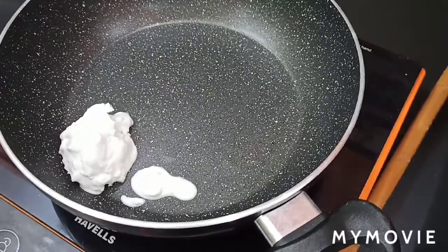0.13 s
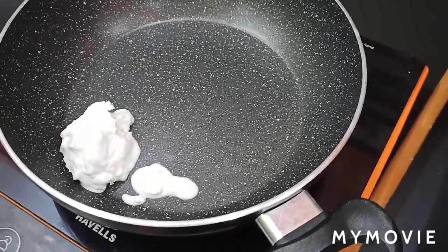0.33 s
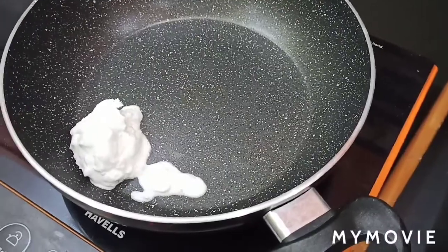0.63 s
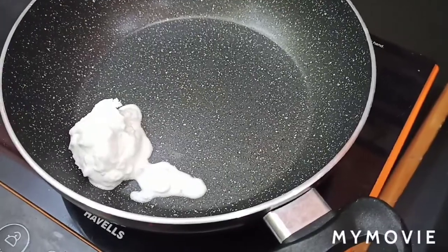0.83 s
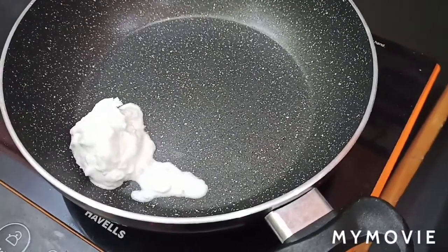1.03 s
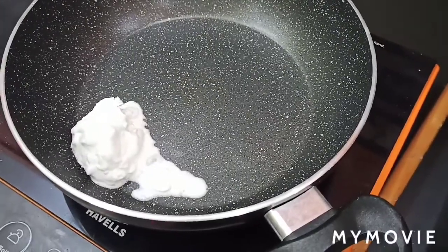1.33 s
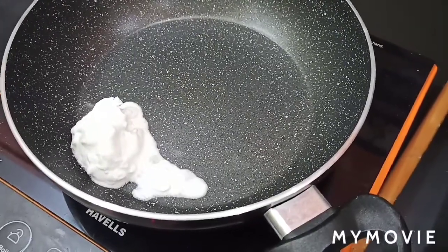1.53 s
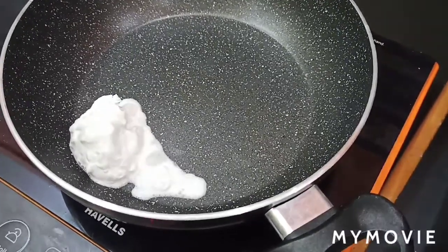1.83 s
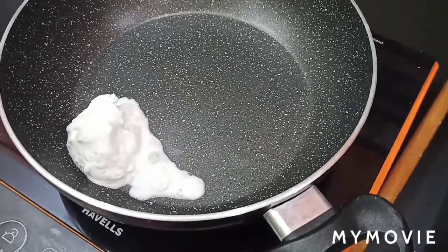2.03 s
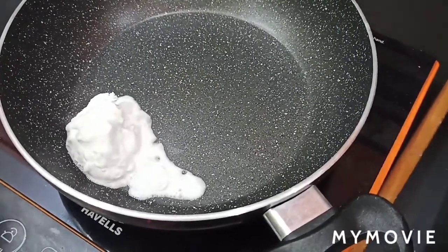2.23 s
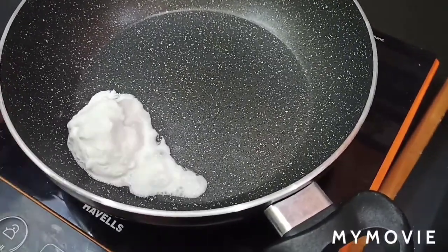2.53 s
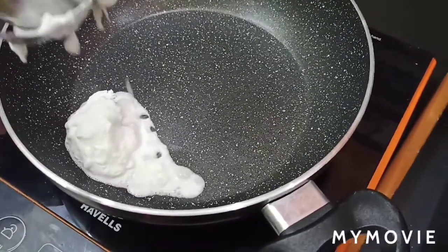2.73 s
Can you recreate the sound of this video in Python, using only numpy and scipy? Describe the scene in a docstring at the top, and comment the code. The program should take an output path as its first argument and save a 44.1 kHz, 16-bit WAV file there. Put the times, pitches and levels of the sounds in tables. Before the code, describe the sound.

Butter sizzles close by in a hot pan throughout, a fine high fizz dotted with small crackles that are busiest around 1.5 seconds. A thin high whine and soft hiss fade from about halfway. Just after 2 seconds comes one loud, sharp pop with a brief ping, then the sizzle carries on, slightly thinner. The cooktop's fan and electrical hum run steadily underneath.

```python
"""In a kitchen, butter sizzles in a hot pan: countless tiny bubbles burst in flurries,
and larger ones ping and crackle. About two seconds in, a trapped drop of water turns to steam
with a loud pop that rings the pan. The cooktop's fan and mains hum run underneath,
and a thin high whine fades about halfway through."""
import sys
import numpy as np
from scipy import signal
from scipy.fft import rfft, irfft, next_fast_len
from scipy.io import wavfile
from scipy.ndimage import uniform_filter1d, map_coordinates

SR = 44100
rng = np.random.default_rng(int(sys.argv[2]) if len(sys.argv) > 2 else 0)


def transcribe(signal):
    """Save signal, clipped to [-1, 1], as a 16-bit WAV file at the path in sys.argv[1]."""
    frames = np.atleast_2d(signal).T
    limited = np.clip(frames, -1, 1)
    pcm = np.round(limited * 32767).astype(np.int16)
    wavfile.write(sys.argv[1], SR, pcm)


N = 127890
TIME = np.arange(N) / SR

# A "colour" says how strong the low and high parts of a noise are compared with each other.
# Colour of the fan's rushing air: f/Hz, relative level/dB
FAN_COLOUR = [(25, -37), (45, -18), (65, -14.5), (100, -3), (155, -9.5), (200, -4), (255, -5), (320, -4),
              (400, 1.5), (480, 3), (525, -4.5), (760, 0.5), (900, -4.5), (1050, -7), (1220, -12),
              (1600, -11.5), (2030, -15.5), (2500, -13.5), (2700, -15), (3100, -12.5), (3550, -17.5),
              (3950, -18.5), (15000, -28.5)]
# Fan tones and ringing air ducts: f/Hz, width/Hz, level/dB
FAN_BANDS = [(288.3, 6.7, -56), (326.6, 8.2, -56.5), (362, 17, -53.5), (429, 24, -50), (452, 13, -51.5),
             (478.5, 12, -54.5), (571, 9.6, -66), (753, 86, -58.5), (826, 19, -58), (1315, 6.6, -63.5)]
# Humming tones: f/Hz, level/dB, pitch drift/Hz, level waver/dB, waver rate/Hz
HUM_TONES = [(118.3, -57, .9, .9, 25), (450, -50.6, 15, 2.4, 65), (1142.5, -52.3, 2.3, 1.3, 25)]
# How the whine fades: t/s, level/dB
WHINE_LEVELS = [(0, -47.5), (.45, -46.5), (.75, -45), (1.0, -49), (1.3, -46.5), (1.5, -55), (1.75, -51),
                (2.9, -68)]
# The whine's narrow bands of noise: f/Hz, width/Hz, relative level/dB
WHINE_BANDS = [(6012, 20, -4), (6140, 100, -1.5), (6387, 10, -8), (6480, 25, -6), (7502, 30, -4),
               (7600, 70, -8)]
# Its clearest tone: f/Hz, relative level/dB, pitch drift/Hz, level waver/dB, waver rate/Hz
WHINE_TONE = (6485, -.5, 5, 2, 20)
# How the soft hiss fades: t/s, level/dB
HISS_LEVELS = [(0, -53), (.6, -54.5), (1.4, -62), (2.9, -70)]
# Colour of that hiss: f/Hz, relative level/dB
HISS_COLOUR = [(2000, -31.5), (3000, -2), (3600, 6.5), (4300, -4), (5200, -3), (8000, -30)]
# How the sizzle rises and falls: t/s, relative sizzle level/dB, relative fizz level/dB
SIZZLE_LEVELS = [(0, -39, -63), (.12, -41, -60), (.145, -39, -46), (.18, -39.5, -52.5), (.6, -41, -49),
                 (1.0, -40, -49), (1.15, -39.5, -47), (1.55, -40, -46), (1.85, -41.5, -50),
                 (2.04, -40.5, -49.5), (2.2, -40.5, -55), (2.32, -43.5, -49.5), (2.55, -42.5, -51),
                 (2.79, -43.5, -51), (2.85, -46, -55), (2.89, -40, -54)]
# Colour of the bursting bubbles: f/Hz, relative level/dB
SIZZLE_COLOUR = [(1200, -25.5), (2300, -12.5), (3050, -13.5), (3900, -22), (4400, -12), (4900, -7),
                 (5300, -4), (6200, -2), (7200, -1), (8400, -3.5), (9400, -8.5), (10100, -17.5),
                 (11000, -17.5), (13500, -11.5), (15500, -10)]
# Colour of the finest, highest fizz: f/Hz, relative level/dB
FIZZ_COLOUR = [(2000, -35), (4000, -30), (5500, -6), (9000, 8), (10800, 3), (11700, 7), (13400, 5.5),
               (14500, 0), (15600, 0.5)]
# Notes of the pan that the bubbles keep ringing: f/Hz, width/Hz, relative level/dB
PAN_BANDS = [(2900, 90, -19), (3170, 70, -22), (4900, 110, -13), (5560, 60, -16), (7070, 110, -14),
             (8100, 70, -14), (8330, 90, -12), (8900, 80, -15), (9390, 50, -19), (9680, 60, -21),
             (10420, 90, -24), (13200, 90, -21)]
# Single crackles: t/s, relative level/dB, f/Hz, time to fade 60 dB/s, relative spatter level/dB
CRACKLES = [(.0314, -28, 7000, .008, -48), (.4043, -32, 7500, .008, -50), (.432, -32, 6530, .008, -33),
            (.5055, -23, 9500, .004, -41), (.5656, -29, 7000, .008, -48), (.7845, -24, 8500, .006, -50),
            (.8443, -22, 11800, .004, -36), (1.0002, -21, 11000, .003, -41), (1.068, -21, 9500, .003, -40),
            (1.115, -29, 8000, .006, -38), (1.125, -20.5, 7400, .008, -48),
            (1.3996, -15.5, 11300, .003, -45), (1.4243, -25, 8000, .014, -48),
            (1.468, -17, 7000, 0.01, -48), (1.4714, -22, 7400, .007, -34), (1.4805, -29, 12600, .006, -53),
            (1.531, -32, 7800, .008, -36), (1.5455, -21, 8800, .004, -42), (1.564, -29, 8200, .006, -42),
            (1.6595, -24, 7100, .009, -35), (1.7472, -27, 9500, .004, -40), (1.787, -30, 7500, .008, -40),
            (1.7929, -28, 11000, .004, -48), (1.8183, -28, 7800, .007, -44),
            (1.9254, -30, 6800, .009, -32.5), (1.9541, -25, 7000, .009, -37),
            (2.0003, -27, 7900, .008, -45), (2.028, -29, 7000, .008, -34), (2.101, -26, 7700, .009, -42),
            (2.2482, -30, 8500, .005, -46), (2.3134, -33, 10000, .005, -48), (2.4322, -32, 7550, .008, -50),
            (2.5054, -26, 7760, .009, -42), (2.538, -35, 12500, .004, -55), (2.6443, -28, 12500, .004, -50),
            (2.715, -32, 12000, .004, -50), (2.756, -31, 6500, .008, -39), (2.789, -30, 7040, .009, -36),
            (2.8832, -29, 8000, .007, -37)]
# Notes that ring with the pop: f/Hz, relative level/dB, time to fade 60 dB/s
POP_NOTES = [(3241, -25, .025), (4840, -24, .03), (5006, -21, .04), (5700, -15, .02), (6009, -9, .065),
             (6290, -12, .03), (6135, 0, .014), (6476, -14, .04), (6900, -14, .02), (7235, -13, .03),
             (7505, -3, .026), (8080, -17, .025), (8550, -22, .025), (9566, -22, .03), (10580, -26, .03),
             (15050, -25, .03), (4500, -20, .012)]
# Colour of the pop's spray: f/Hz, relative level/dB
SPRAY_COLOUR = [(2000, -46), (3300, -20), (4100, -6), (5500, -4), (6300, -20), (8000, 6), (9500, -13),
                (10500, -10), (13500, -20), (15000, -7)]
# The pop's echoes off the pan's side and a near wall: delay/s, relative level/dB
POP_ECHOES = [(.00212, -3), (.012, -15)]


def amp(db):
    """Turn decibels into a number to multiply by."""
    return 10 ** (np.asarray(db) / 20)


def unit(x):
    """Scale a signal to an average strength (rms) of 1."""
    return x / np.sqrt(np.mean(x ** 2) + 1e-20)


def curves(rows):
    """Join a table's points with straight lines: one curve for each column after the time."""
    times, *columns = np.transpose(rows)
    return [np.interp(TIME, times, column) for column in columns]


def wobble(rate):
    """A smooth random curve that passes through `rate` new values a second."""
    return map_coordinates(rng.standard_normal(int(N * rate / SR) + 4), [TIME * rate])


def dying(start, t60):
    """A level that jumps to 1 at `start`, then falls by 60 dB every `t60` seconds."""
    t = TIME - start
    return (t >= 0) * amp(-60 * np.abs(t) / t60)


def coloured(x, colour):
    """Give a sound a colour; plain white noise keeps its overall strength."""
    size = 2 * next_fast_len(N)
    hz, db = np.transpose(colour)
    log_hz = np.log(np.fft.rfftfreq(size, 1 / SR) + 1)
    gain = unit(amp(np.interp(log_hz, np.log(hz), db)))
    # These steps make the filter ring only after a click, never before it.
    cepstrum = irfft(np.log(gain))
    cepstrum[1:size // 2] *= 2
    cepstrum[size // 2 + 1:] = 0
    return irfft(rfft(x, size) * np.exp(rfft(cepstrum)))[:N]


def narrow_bands(rows):
    """Noise that rings around each of the listed pitches."""
    f = np.fft.rfftfreq(N, 1 / SR)
    return sum(amp(db) * unit(irfft(rfft(rng.standard_normal(N)) / (1 + ((f - hz) / width) ** 2), N))
               for hz, width, db in rows)


def wavering_tone(hz, db, drift_hz, waver_db, rate):
    """A tone whose pitch and level wander at random."""
    level = np.sqrt(2) * amp(db + waver_db * wobble(rate))
    pitch = hz + drift_hz * wobble(rate)
    return level * np.sin(2 * np.pi * np.cumsum(pitch) / SR)


def kitchen_echo(x):
    """The walls throw the sound back as a short blur."""
    tail = dying(0.0016, t60=0.035) * rng.standard_normal(N)
    return signal.fftconvolve(x, tail / np.linalg.norm(tail))[:N]


def cooktop():
    """The cooling fan blows air through its ducts; the mains, fan blades and motor hum."""
    air = amp(-41.5) * coloured(rng.standard_normal(N), FAN_COLOUR)
    return air + narrow_bands(FAN_BANDS) + sum(wavering_tone(*row) for row in HUM_TONES)


def whine():
    """Thin high tones of the hot pan and a soft hiss below them, both fading away."""
    whine_db, = curves(WHINE_LEVELS)
    hiss_db, = curves(HISS_LEVELS)
    tones = narrow_bands(WHINE_BANDS) + wavering_tone(*WHINE_TONE)
    hiss = coloured(rng.standard_normal(N), HISS_COLOUR)
    return amp(whine_db) * tones + amp(hiss_db) * hiss


def bursts(rate, spread_db):
    """Tiny bubbles burst as random clicks, about `rate` a second; sparser clicks are stronger."""
    clicks = (rng.random(N) < rate / SR) / np.sqrt(rate)
    sizes = amp(spread_db * np.clip(rng.standard_normal(N), -2, 2))
    return unit(clicks * sizes * rng.choice([-1, 1], N))


def flurries(per_second=90, fade_s=0.0057):
    """How busy the foam is, 1 on average: each collapse briefly sets off its neighbours."""
    kicks = np.abs(bursts(per_second, spread_db=6))
    activity = signal.lfilter([1], [1, -np.exp(-1 / (fade_s * SR))], kicks)
    local_average = np.abs(uniform_filter1d(activity, size=5000))
    activity /= local_average + activity.mean() / 10  # even out the slow swells
    return activity / activity.mean()


def ringing_bubbles(count=900, centre_hz=7250, spread_octaves=0.182, t60=0.012):
    """Bubbles in the foam each ring for a moment at their own pitch."""
    start, pitch, size = rng.random(count), rng.standard_normal(count), rng.standard_normal(count)
    t = np.arange(SR // 100) / SR
    hz = np.clip(centre_hz * 2 ** (spread_octaves * pitch), 4700, 9500)[:, None]
    level = amp(2.6 * np.clip(size, -2, 2))[:, None]
    rings = level * np.sin(2 * np.pi * hz * t) * amp(-60 * t / t60) * (1 - np.exp(-t * hz / 2))
    at = (start * N).astype(int)[:, None] + np.arange(len(t))
    return unit(np.bincount(at.ravel(), rings.ravel(), N)[:N])


def sizzle():
    """Bubbles burst steadily and in flurries; as the butter melts they thin out and flurries stand out."""
    sizzle_db, fizz_db = curves(SIZZLE_LEVELS)
    bursts_per_s = np.interp(TIME, [0, 2.4], [6000, 1300])
    flurry_share = np.interp(TIME, [0, 1.8, 2.4], [.1, .5, .36])
    main_flurries, fizz_flurries = flurries(), flurries()
    swell = np.sqrt(1 - flurry_share + flurry_share * main_flurries)
    fizz_swell = np.sqrt(1 - flurry_share + flurry_share * (main_flurries + fizz_flurries) / 2)
    foam = coloured(bursts(bursts_per_s, spread_db=0) * swell, SIZZLE_COLOUR)
    ringing = swell * (amp(-3.5) * narrow_bands(PAN_BANDS) + amp(-6.5) * ringing_bubbles())
    fizz = coloured(bursts(bursts_per_s, spread_db=3) * fizz_swell, FIZZ_COLOUR)
    return amp(sizzle_db + 2) * (foam + ringing) + amp(fizz_db + 2.5) * fizz


def crackles(crack_t60=.004, spatter_t60=.094):
    """Larger bubbles burst, each with a crack, a brief ping and a little spatter of fat."""
    t = np.arange(SR // 10) / SR
    snaps, spatter_level = np.zeros((2, N + SR))
    for start, db, hz, t60, spatter_db in CRACKLES:
        at = slice(round(start * SR), round(start * SR) + len(t))
        ping = amp(-60 * t / t60) * np.sin(2 * np.pi * hz * t) * (1 - np.exp(-t * hz))
        crack = amp(-13 - 60 * t / crack_t60) * rng.standard_normal(len(t))
        near_pitch = signal.butter(2, [.6 * hz, 1.3 * hz], 'bandpass', fs=SR)
        snaps[at] += amp(db) * (ping + 2 * signal.lfilter(*near_pitch, crack))
        spatter_level[at] += amp(spatter_db - 60 * t / spatter_t60)
    spatter = coloured(spatter_level[:N] * rng.standard_normal(N), SIZZLE_COLOUR)
    return amp(1) * snaps[:N] + amp(1.5) * spatter


def pop(start_s=2.0641):
    """A trapped drop of water flashes to steam: a ring and a spray, both echoed, and spattering fat."""
    t = TIME - start_s
    ring = sum((-1) ** k * amp(db) * dying(start_s, t60) * np.sin(2 * np.pi * hz * t)
               for k, (hz, db, t60) in enumerate(POP_NOTES))
    spray = coloured(dying(start_s, t60=.024) * rng.standard_normal(N), SPRAY_COLOUR)
    quick_rise = 1 - dying(start_s, t60=.00087)
    direct = (amp(-12.5) * ring + amp(-23.5) * spray) * quick_rise
    echoes = sum(amp(db) * np.roll(direct, round(delay * SR)) for delay, db in POP_ECHOES)
    spatter = coloured(dying(start_s, t60=.13) * rng.standard_normal(N), SIZZLE_COLOUR)
    return direct + echoes + amp(-33) * spatter


def scene():
    """The pan on its cooktop in the kitchen, in one channel."""
    pan = sizzle() + crackles() + pop()
    return (pan + amp(-10.5) * kitchen_echo(pan) + whine() + cooktop())[None]


def record(dry):
    """Cut away the very highest treble."""
    top_hz = 15560
    size = next_fast_len(N + SR // 2)
    return irfft(rfft(dry, size) * (np.fft.rfftfreq(size, 1 / SR) < top_hz), size)[..., :N]


dry = scene()
out = record(dry)
transcribe(out)
```